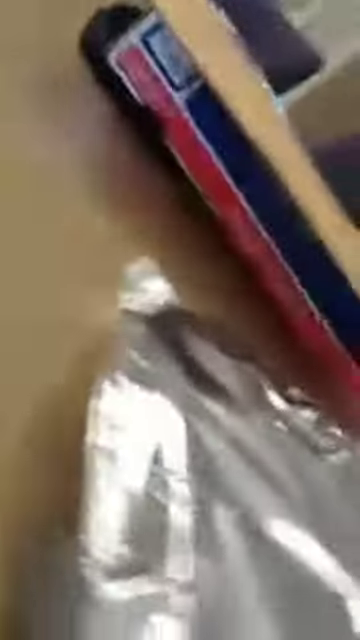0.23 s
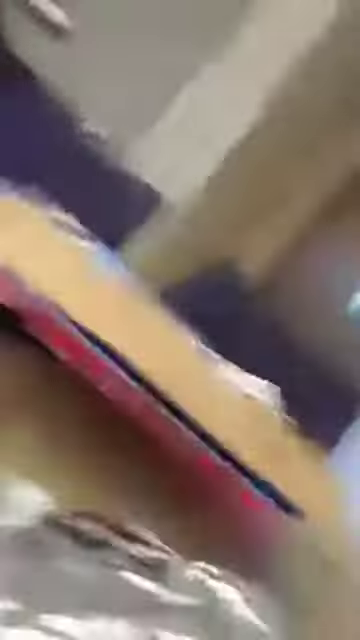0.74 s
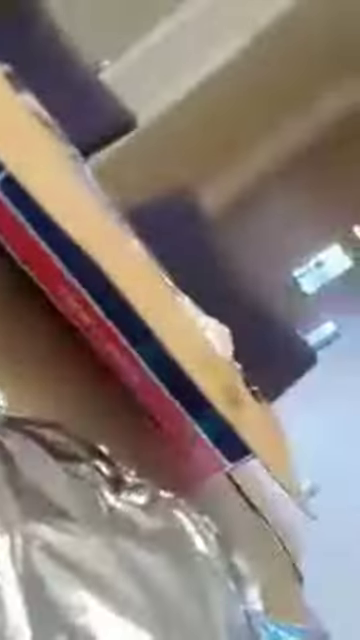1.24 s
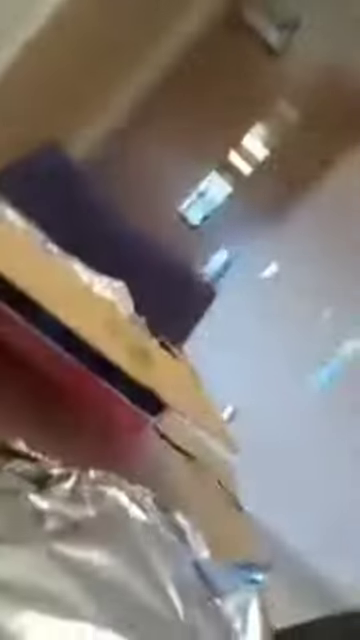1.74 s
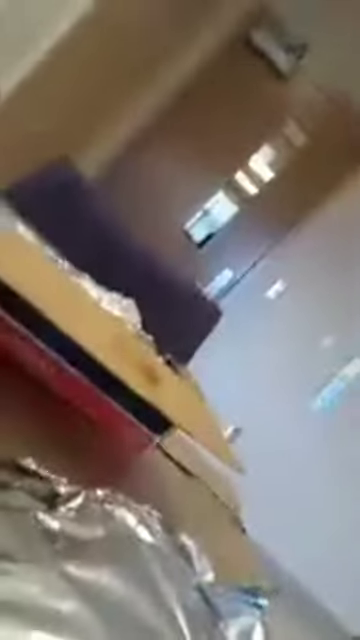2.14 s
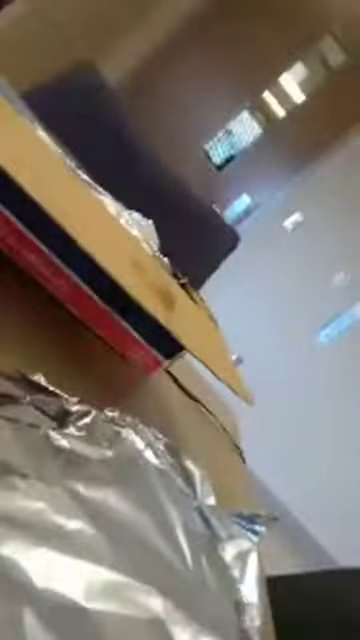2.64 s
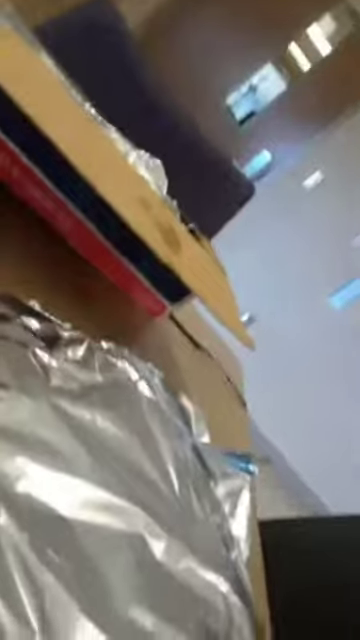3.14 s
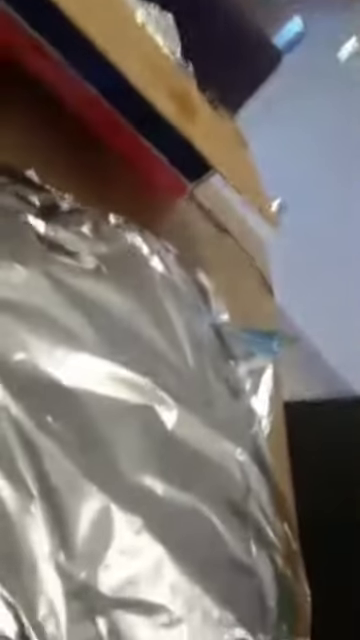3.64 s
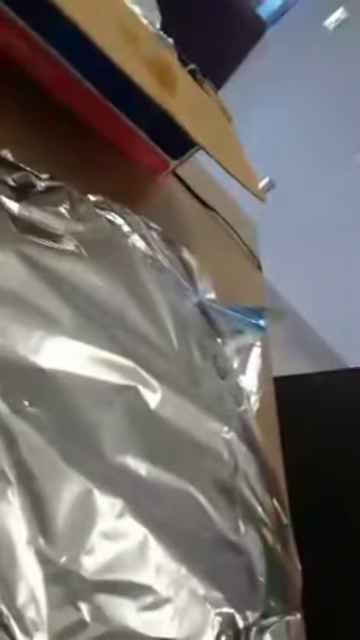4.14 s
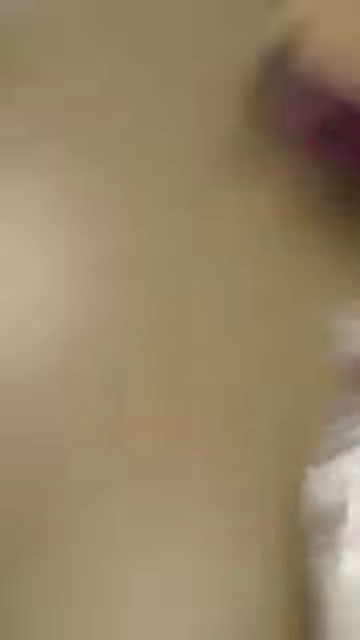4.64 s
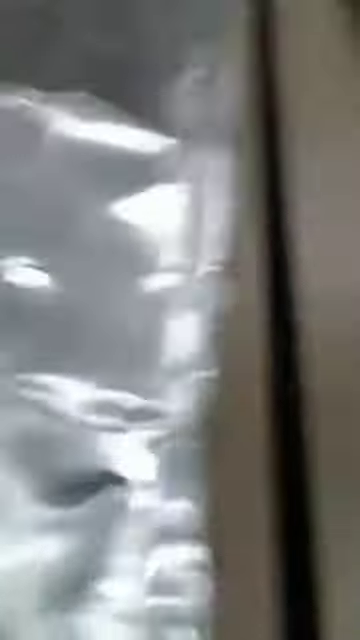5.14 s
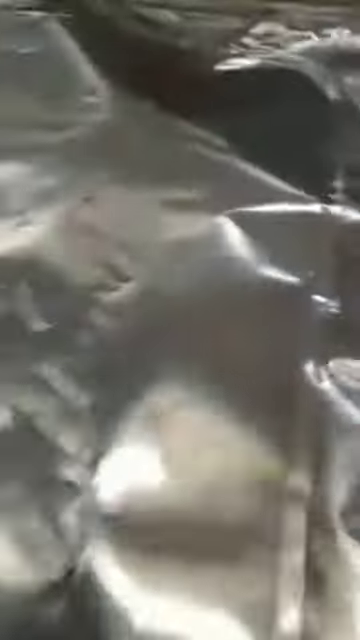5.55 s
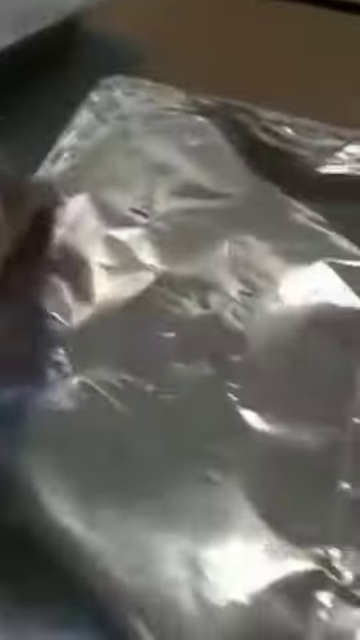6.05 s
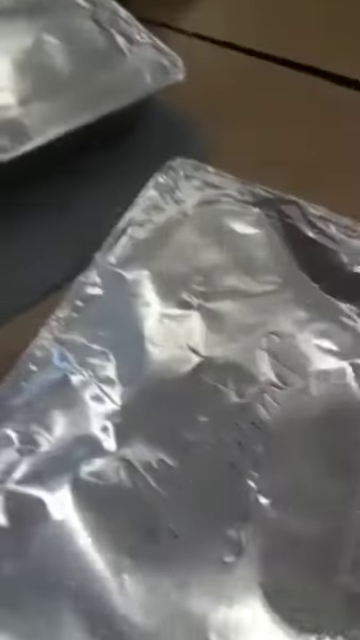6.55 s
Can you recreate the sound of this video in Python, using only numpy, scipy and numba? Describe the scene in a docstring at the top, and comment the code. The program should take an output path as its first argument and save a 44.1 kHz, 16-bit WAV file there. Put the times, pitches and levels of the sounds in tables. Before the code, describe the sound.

Right beside a phone at a table, hands move foil-covered pans. After a brief silence the foil crumples densely and loudly, with snaps and popping dents, then comes in separate bursts with quieter gaps. Table thuds and hollow knocks punctuate it. Near the end it is calmer, with light rustling, dull bumps on the phone and a quick clatter of pan knocks.

```python
"""At a table, right beside a phone, hands move foil-covered pans about.
The foil rustles in dense random buckles and snaps loose in crackles: noise and small ringing facets in
half-octave bands, each band dying at its own rate. Creases tick as short bright noise bursts and dents
pop as clusters of damped sines. The pans knock, the table thuds and the phone case bumps as struck modes,
while skin hisses over the foil and the grip on the phone shifts."""
import sys
import numpy as np
from scipy import signal
from scipy.fft import rfft, irfft, next_fast_len
from scipy.io import wavfile
from scipy.ndimage import uniform_filter1d
from numba import njit

SR = 44100
rng = np.random.default_rng(int(sys.argv[2]) if len(sys.argv) > 2 else 0)


def decibels_to_gain(level_db):
    """Convert a level in decibels to a linear amplitude gain (20 dB per decade)."""
    exponent = np.asarray(level_db, float) / 20
    return 10 ** exponent


def store_wav(level_fs):
    """Save 16-bit WAV to argv[1]."""
    pcm = np.round(np.clip(np.atleast_2d(level_fs), -1, 1) * 32767)
    wavfile.write(sys.argv[1], SR, pcm.T.astype(np.int16))


N = 299042
PAD = next_fast_len(N)
T = np.arange(N) / SR
BANDS_HZ = 35 * 2 ** np.arange(0, 9, .5)  # centres of the half-octave bands

# the hand shifts its grip on the phone: [start_s, hold_s, level_db]
GRIPS = [(0.1, 0.34, -51.5), (0.5, 0.033, -28), (0.652, 0.12, -30), (0.9, 0.53, -43), (1.5, 0.079, -30),
         (1.933, 0.28, -44.5), (2.306, 0.043, -34), (2.55, 0.13, -55), (2.785, 0.024, -41),
         (3.1, 0.023, -36), (3.829, 0.044, -32), (4.082, 0.11, -42), (4.533, .04, -32.5),
         (4.622, 0.093, -38), (5.207, 0.39, -45.5), (5.637, 0.11, -38), (6.0, 0.15, -34.5),
         (6.5, 0.3, -54.5)]
# fingers bump the phone: [start_s, level_db]
BUMPS = [(5.458, -39), (5.501, -30.5), (5.642, -29), (5.68, -29), (6.04, -38), (6.1, -43)]
# skin slides over the foil: [start_s, hold_s, level_db]
RUBS = [(0.073, 0.064, -51.5), (0.155, 0.084, -39.5), (0.232, 0.0909, -37), (0.336, 0.0088, -22),
        (0.626, 0.019, -24), (0.73, 0.028, -37), (0.845, 0.16, -44.5), (1.038, 0.28, -59),
        (1.258, 0.13, -55.5), (1.44, 0.17, -40.5), (1.665, 0.24, -57), (2.293, 0.051, -46),
        (2.487, 0.29, -59.5), (3.533, 0.085, -58.5), (3.92, 0.088, -57), (4.036, 0.08, -51),
        (4.185, 0.2, -54.5), (4.517, 0.17, -41.5), (4.629, 0.033, -37), (4.724, 0.15, -49),
        (5.104, 0.092, -41.5), (5.28, 0.39, -51.5), (5.703, 0.31, -54.5), (5.926, 0.22, -48),
        (6.153, 0.098, -38.5), (6.242, 0.13, -43.5), (6.38, 0.4187, -57.5), (6.603, 0.2, -46.5),
        (6.727, .07, -39.5)]
# a hand squeezes or shifts a pan: [start_s, hold_s, crumple_db, weight_db, crispness_db];
# weight (table rumble) and crispness (crackle) are relative to the crumpling
SQUEEZES = [(0.088, 0.03, -37, -13, -8), (0.124, 0.26, -24.5, -17, -14.5), (0.427, 0.15, -19.5, -15, -8),
            (0.605, 0.068, -21, -6, 2.5), (0.669, 0.014, -18.5, -4, -2.5), (0.753, 0.012, -15.5, -4, -3),
            (0.863, 0.12, -36.5, -1.5, -8.5), (1.05, 0.43, -50.5, 1, -4.5), (1.333, 0.028, -36.5, -1, -15),
            (1.507, 0.046, -27.5, 4.5, -7), (1.605, 0.06, -35, 2.5, -26.5), (1.75, 0.29, -54.5, 4, -1.5),
            (2, 0.12, -37.5, -2, -22.5), (2.107, 0.099, -32, -6, -22), (2.287, 0.078, -25.5, -28, -9),
            (2.48, 0.11, -40, -4, -11), (2.607, 0.048, -32.5, -0.5, -12), (2.86, 0.084, -52, -1, -6.5),
            (3.08, 0.053, -34, -3, -13), (3.502, 0.11, -56.5, 1, -5.5), (3.803, 0.0695, -30.5, -14, -21),
            (3.999, 0.057, -38.5, 5, -18), (4.118, 0.079, -40.5, 3.5, -31), (4.309, 0.094, -44, -2.5, -8.5),
            (4.548, 0.032, -53, 11, -8), (4.654, 0.039, -49, 9, -20), (4.666, 0.0068, -22.5, -9, -7.5),
            (4.79, 0.077, -56, 13.5, -4), (4.94, 0.2, -50.5, 3.5, -9), (5.175, 0.033, -62, 21.5, -15),
            (5.3, 0.074, -46, 0, -11.5), (5.466, 0.74, -52, 4.5, -10), (5.916, 0.29, -47.5, -10, -8),
            (6.188, 0.049, -41.5, -14, -7), (6.305, 0.022, -26.5, -27, -11), (6.416, 0.076, -49.5, 8, -3),
            (6.548, 0.13, -44, 2, -13), (6.77, .06, -37.5, 1, -3)]
# hollow knocks of a pan on the table: [start_s, level_db, depth_db]; depth is added for the lowest mode
KNOCKS = [(3.239, -21.5, 33.5), (3.643, -33, 30), (4.422, -25.5, 13), (5.1, -25, 8), (5.546, -31, 0),
          (5.625, -21.5, -7), (6.184, -18, -1), (6.224, -23, 3), (6.283, -20, 0), (6.293, -15.5, -2),
          (6.328, -12, -7), (6.345, -13, -4)]
# dents in the sheet popping through: [start_s, pitch_hz, level_db]
DENTS = [(0.186, 1054, -20), (0.21, 1190, -24), (0.229, 980, -21), (0.296, 710, -23.5), (0.402, 666, -17.5),
         (0.45, 1610, -13.5), (1.472, 916, -12), (1.6, 1426, -15.5), (1.629, 653, -20), (3.83, 1130, -13.5),
         (4.685, 2790, -25), (5.101, 1960, -30), (5.269, 1750, -36), (5.63, 1770, -34)]
# lone creases flipping: [start_s, level_db]
TICKS = [(0.0817, -34), (0.23, -26), (0.2794, -20), (0.3504, -8.5), (0.5234, -16), (0.647, -9.5),
         (0.7444, -25), (0.7497, -12), (0.7576, -14), (0.867, -26), (1.5186, -10), (1.5235, -12.5),
         (1.5523, -23), (1.5839, -8), (1.627, -22), (2.0144, -30), (2.047, -28.5), (2.2244, -34),
         (2.2717, -26), (2.391, -24), (2.4236, -12), (2.7657, -12.5), (3.164, -26), (3.852, -6), (3.87, -9),
         (4.254, -37.5), (4.484, -38), (4.521, -28), (4.637, -9), (6.164, -35), (6.3199, -24)]
# snaps of the foil: [start_s, blow_db, thud_db, brightness_db, ring_t60_s];
# thud and brightness are relative to the blow, the ring time is scaled by SHEET_DAMPING
SNAPS = [(0.281, -4.5, -36, -16, 0.03), (0.352, -15.5, -22, -10, 0.29), (0.4, -19, -17, -3, 0.069),
         (0.427, -14.5, -41, -9.5, 0.63), (0.46, -13, -34, -10.5, 0.17), (0.522, -7.5, -27.5, -8.5, 0.75),
         (0.617, -7.5, -59, -15, 1), (0.707, -11, -16, -7.5, 0.13), (0.734, -19, 6.5, -13, 0.069),
         (0.775, -8.5, -30, -7.5, 0.17), (0.87, -16.5, -26, -12, 0.095), (0.935, -19, -17.5, -25, 0.21),
         (1.32, -9.5, -23, -27, 0.078), (1.422, -31.5, -13, -7, 0.45), (1.436, -19, -20, -23, 0.47),
         (1.469, -11.5, -35, -12, 0.41), (1.558, -15, -9.5, -2.5, 0.13), (1.585, -15, -17, -2, 0.22),
         (1.628, -14, -27, -6.5, 0.042), (1.72, -24.5, -21.5, -29, 0.43), (1.755, -15.5, -18, -21, 0.023),
         (1.943, -30.5, -18, -9, 0.61), (1.964, -10.5, -38.5, -32, 0.085), (1.978, -18, -11, -2, 0.2),
         (2.081, -21.5, -19, -6, 0.16), (2.12, -14, -70, -7.5, 0.19), (2.208, -21, -18.5, -13, 0.31),
         (2.277, -16, -13, -49, 0.12), (2.33, -14, -12.5, -2.5, 0.21), (2.34, -12, -25.5, -1.5, 0.21),
         (2.424, -14, -73, -8, 0.13), (2.495, -26, -17, -16, 0.29), (2.767, -18.5, -22, -4.5, 0.2),
         (3.093, -12.5, -22, -6, 0.1), (3.096, -13, -19, -4, 0.16), (3.281, -39.5, -41.5, -8, 0.18),
         (3.478, -36, -11.5, -46, 0.061), (3.626, -21.5, -46, -17.5, 0.032), (3.642, -26.5, -5, -30, 0.16),
         (3.759, -25.5, -17, -21.5, 0.56), (3.79, -23, -13, -7, 0.62), (3.807, -17, -11, -4.5, 0.35),
         (3.828, -13.5, -9.5, -4, 0.22), (3.858, -8, -13, -5.5, 0.19), (3.98, -18.5, -25, -11.5, 0.15),
         (4.059, -18, -35, -11, 0.17), (4.112, -16.5, -9.5, 0.5, 0.12), (4.12, -12.5, -23.5, -10.5, 0.18),
         (4.226, -36.5, -2, -11, 0.26), (4.422, -16, -16, -30, 0.03), (4.482, -26, -32, -11, 0.03),
         (4.497, -22, -26, -14.5, 0.11), (4.537, -14, -16, -12.5, 0.14), (4.546, -17, -5, -2.5, 0.12),
         (4.632, -18.5, 5.5, -11, 0.18), (4.642, -9.5, -44, -14, 0.28), (5.098, -29.5, -1.5, -6, 0.37),
         (5.271, -30, -14, -9, 0.26), (5.546, -35, -13, -37, 0.13), (5.621, -31, -12.5, -10, 0.3),
         (6.163, -29.5, -6, -3.5, 0.12), (6.181, -27.5, -11.5, -37, 0.55), (6.224, -15, -29, -14.5, 0.1),
         (6.279, -17, -28, -24, 0.14), (6.325, -22.5, -12, -8, 0.2), (6.341, -25, -14, -0.5, 0.092)]
# resting level of each layer of the handling between gestures: {layer: level_db}
REST_DB = {"rumble": -70.5, "crumple": -61, "crackle": -72, "hiss": -66, "grip": -68.5}

# spectra of the layers of the handling: [frequency_hz, level_db]
GRIP_SPECTRUM = [(30, -10), (60, -5.5), (100, 5), (130, -4), (170, -46.5)]
RUMBLE_SPECTRUM = [(100, -37), (150, 14), (200, 8.5), (300, 3), (450, -30.5)]
CRUMPLE_SPECTRUM = [(200, -64.5), (430, 20.5), (900, 6.5), (1700, 8.5), (2700, -7), (4000, -48)]
CRACKLE_SPECTRUM = [(1800, -5.5), (2800, 8), (4000, -12.5), (5500, 7.5), (7500, -38.5)]
RUB_SPECTRUM = [(4500, -12), (6000, -13), (8500, -13), (10500, 6.5), (14000, -20)]
# spectrum of a flipping crease: [frequency_hz, level_db]
TICK_SPECTRUM = [(1500, -32.5), (3000, 14), (6000, 8.5), (8500, 8), (10500, 6), (14000, -1.5)]
# the treble of the whole mix is weaker around 10 kHz: [frequency_hz, gain_db]
TREBLE_DIP = [(8600, -1.5), (9700, -11), (10800, -10), (13500, -2.5)]
# factor on a given ring time of the sheet: [frequency_hz, time_ratio]
SHEET_DAMPING = [(100, 0.27), (300, 1.84), (1000, 1.36), (2500, 0.97), (5000, 0.61), (12000, 0.76)]
# modes of the phone case, the table top and a pan: [frequency_hz, level_db, t60_s]
CASE_MODES = [(70, 9, 0.058), (125, 7.5, .06)]
TABLE_MODES = [(104, -21.5, 0.081), (197.3, -0.5, 0.31)]
PAN_MODES = [(252, -32, 0.1), (499, -0.5, 0.091), (982, -8, 0.12)]


def at_hz(table, hz):
    """Linear interpolation of a spectrum on a logarithmic frequency axis."""
    table_hz, value = np.transpose(table)
    return np.interp(np.log(np.maximum(hz, 1)), np.log(table_hz), value)


def unit(x):
    """Normalization to an rms of 1."""
    return x / np.sqrt(np.mean(x ** 2))


def colour(x, table):
    """Linear filtering: the spectrum is multiplied by a gain in dB."""
    gain = decibels_to_gain(at_hz(table, np.fft.rfftfreq(PAD, 1 / SR)))
    return irfft(rfft(x, PAD) * gain, PAD)[:N]


def fade(t, t60):
    """Exponential decay of amplitude, 60 dB in t60 seconds."""
    return np.exp(-np.log(1000) * t / t60)


def bands(x):
    """Filter bank: overlapping half-octave bands with cosine flanks, each of rms 1."""
    octaves = np.log2(np.maximum(np.fft.rfftfreq(PAD, 1 / SR), 1) / BANDS_HZ[:, None])
    flank = np.cos(np.pi * np.clip(octaves, -.5, .5))
    split = irfft(rfft(x, PAD) * flank, PAD)[:, :N]
    return split / split.std(axis=1, keepdims=True)


def gestures(start, hold, db, rise_db_s, fall_db_s, rest_db):
    """Power addition of gestures that swell, hold and die linearly in dB, over a resting level."""
    t = T[::64, None]
    before = np.maximum(start - t, 0)
    after = np.maximum(t - start - hold, 0)
    each = db - rise_db_s * before - fall_db_s * after
    power = decibels_to_gain(rest_db) ** 2 + np.sum(decibels_to_gain(each) ** 2, axis=1)
    return np.interp(T, t[:, 0], 10 * np.log10(power))


def buckles(level_db, table, rate, spread_db, t60):
    """Shot noise: random buckles, many small and few large, as decaying power in each band."""
    size = decibels_to_gain(spread_db * np.minimum(rng.exponential(size=N), 4))
    impulses = (rng.random(N) < rate / SR) * size  # rate in buckles per second
    hit_power = (unit(impulses) * decibels_to_gain(level_db)) ** 2
    share = decibels_to_gain(at_hz(table, BANDS_HZ)) ** 2 * BANDS_HZ  # bandwidth grows with frequency
    share = share / share.sum()
    keep = fade(2 / SR, t60 * at_hz(SHEET_DAMPING, BANDS_HZ))  # power falls twice as fast in dB
    return np.array([w * signal.lfilter([1 - k], [1, -k], hit_power) for w, k in zip(share, keep)])


def strike(blows, modes):
    """Modal synthesis: short pushes excite a set of exponentially damped sines."""
    contact_s = .0006
    push = np.zeros(N)
    for s, db in blows:
        push[int(s * SR)] = decibels_to_gain(db)
    push = uniform_filter1d(push, size=int(contact_s * SR))
    t = np.arange(SR // 2) / SR
    ring = sum(decibels_to_gain(db) * np.sin(2 * np.pi * hz * t) * fade(t, t60) for hz, db, t60 in modes)
    return signal.fftconvolve(push, ring)[:N]


@njit
def ring_facets(size, start, turn, keep, gain):
    """Rotating phasor: each facet rings as one damped sine until it is 40 dB down."""
    out = np.zeros(size)
    for k in range(len(start)):
        z, step, i = gain[k] + 0j, keep[k] * np.exp(1j * turn[k]), start[k]
        while abs(z) > .01 * gain[k] and i < size:
            out[i] += z.imag
            z, i = z * step, i + 1
    return out


def facets(rate=3500, t60=0.078, spread_db=2.5):
    """Modal density: the sheet is a crowd of small facets, each with its own pitch, a few of them loud."""
    when, pitch, size = rng.random((3, int(rate * N / SR)))  # rate in facets per second
    hz = 14500 * pitch ** 1.3 + 100
    gain = decibels_to_gain(spread_db * np.minimum(-np.log(1 - size), 4))
    keep = fade(1 / SR, t60 * at_hz(SHEET_DAMPING, hz))
    return ring_facets(N, (when * N).astype(int), 2 * np.pi * hz / SR, keep, gain)


def shake(power, blur_db=0, click_db=-3, click_rate=400):
    """Forced vibration: band power drives single facets and sharp clicks over a blur of dense modes."""
    clicks = (rng.random(N) < click_rate / SR) * rng.standard_normal(N)  # rate in clicks per second
    blur = decibels_to_gain(blur_db) * rng.standard_normal(N)
    sheet = unit(facets()) + blur + decibels_to_gain(click_db) * unit(clicks)
    cycle = (SR / BANDS_HZ).astype(int) + 1  # a band needs one cycle to build up
    drive = [uniform_filter1d(np.sqrt(p), size=k, origin=(k - 1) // 2) for p, k in zip(power, cycle)]
    return np.sum(bands(sheet) * drive, axis=0)


def grip_shifts():
    """Friction noise: band power of the hand shifting its low-pitched grip on the phone."""
    level = gestures(*np.transpose(GRIPS), rise_db_s=250.5, fall_db_s=220.5, rest_db=REST_DB["grip"])
    return buckles(level, GRIP_SPECTRUM, rate=140, spread_db=2.5, t60=0.05)


def bumps():
    """Impact excitation: fingers bump the phone and ring the low modes of its case."""
    return strike(BUMPS, CASE_MODES)


def rubs():
    """Friction noise: band power of skin sliding over the foil, a dense high hiss."""
    level = gestures(*np.transpose(RUBS), rise_db_s=492, fall_db_s=597.5, rest_db=REST_DB["hiss"])
    return buckles(level, RUB_SPECTRUM, rate=700, spread_db=1.5, t60=.06)


def squeezes():
    """Buckling under load: one gesture drives table rumble, crumpling and crackle as band power."""
    start, hold, db, weight, crisp = np.transpose(SQUEEZES)

    def level(plus_db, layer):
        return gestures(start, hold, db + plus_db, rise_db_s=302, fall_db_s=268.5, rest_db=REST_DB[layer])

    rumble = buckles(level(weight, "rumble"), RUMBLE_SPECTRUM, rate=150, spread_db=1.0, t60=0.085)
    crumple = buckles(level(0, "crumple"), CRUMPLE_SPECTRUM, rate=190, spread_db=2.5, t60=0.22)
    crackle = buckles(level(crisp, "crackle"), CRACKLE_SPECTRUM, rate=290, spread_db=4.5, t60=0.14)
    return rumble + crumple + crackle


def thuds():
    """Impact excitation: the low part of every snap rings the table top."""
    return strike([(s, db + thud) for s, db, thud, *_ in SNAPS], TABLE_MODES)


def knocks():
    """Modal participation: knocks ring the pan, a flat landing exciting the lowest mode more."""
    upper = strike([(s, db) for s, db, _ in KNOCKS], PAN_MODES[1:])
    lowest = strike([(s, db + depth) for s, db, depth in KNOCKS], PAN_MODES[:1])
    return upper + lowest


def dents(scatter=0.095, spread_s=0.011, t60=0.07, count=5):
    """Snap-through: a popping dent sets off neighbouring facets of nearly equal pitch in turn."""
    s, hz, db = np.repeat(np.transpose(DENTS), count, axis=1)
    late, detune = rng.random((len(s), 2)).T
    start = ((s + spread_s * late ** 2) * SR).astype(int)
    hz = hz * (1 + scatter * (2 * detune - 1))
    keep = np.full(len(s), fade(1 / SR, t60))
    return ring_facets(N, start, 2 * np.pi * hz / SR, keep, decibels_to_gain(db))


def ticks(crest_db=-10, rise_s=0.00055, t60=0.086, spike_db=6):
    """Impulsive release: a flipping crease gives a sharp spike and a short bright noise burst."""
    flips = np.zeros(N)
    for s, db in TICKS:
        flips[int(s * SR)] = decibels_to_gain(db + crest_db)
    t = np.arange(SR // 8) / SR
    decay = fade(t, t60) + decibels_to_gain(spike_db) * fade(t, t60 / 6)
    envelope = signal.fftconvolve(flips, decay * np.minimum(t / rise_s, 1))[:N]
    return envelope * unit(colour(rng.standard_normal(N), TICK_SPECTRUM))


def snaps():
    """Frequency-dependent damping: band power of snaps that crack, then ring on in the sheet."""
    low_db, hollow_db, trim_db, top_db = -20, -3, -9, -9
    edge_db, edge_tilt = -10.5, 2.19  # the top follows the brightness, more steeply
    crack_db, crack_t60, crack_rise_s = 2.5, 0.013, 0.00079
    rise_share = 0.023  # rise of the ring as a share of its t60
    power = np.zeros((len(BANDS_HZ), N))
    t = np.arange(SR // 3) / SR
    crack = decibels_to_gain(crack_db) * fade(t, crack_t60) * np.minimum(t / crack_rise_s, 1)
    for s, db, thud, bright, t60 in SNAPS:
        edge = edge_db + edge_tilt * bright
        shape = [(60, thud + low_db), (190, thud), (330, (thud + trim_db) / 2 + hollow_db), (900, trim_db),
                 (2600, bright), (6500, edge), (8800, edge), (11000, edge + top_db)]
        gain = decibels_to_gain(db + at_hz(shape, BANDS_HZ))[:, None]
        ring = fade(t, t60 * at_hz(SHEET_DAMPING, BANDS_HZ)[:, None]) ** 2
        ring = ring * np.minimum(t / (rise_share * t60), 1)
        ring = ring * (1 - t / t[-1])  # reaches zero after a third of a second
        i = int(s * SR)
        power[:, i:i + len(t)] += (gain ** 2 * (ring + crack ** 2))[:, :N - i]
    return power


def scene():
    """Superposition of all sources into one mono sound, with a faint random treble difference added."""
    start_s, fade_in_s = 0.055, 0.021  # silence, then a quick fade-in
    side_db, side_hz = -20, 4400
    foil = shake(grip_shifts() + rubs() + squeezes() + snaps())
    mono = colour(foil + bumps() + thuds() + knocks() + dents() + ticks(), TREBLE_DIP)
    mono = mono * np.clip((T - start_s) / fade_in_s, 0, 1)
    treble = signal.sosfilt(signal.butter(8, side_hz, "high", fs=SR, output="sos"), mono)
    random_gain = unit(uniform_filter1d(rng.standard_normal(N), size=120))
    side = decibels_to_gain(side_db) * treble * random_gain
    return np.array([mono + side, mono - side])


def band_limit(x):
    """A steep low-pass at the top of the band."""
    return signal.sosfilt(signal.butter(12, 15700, fs=SR, output="sos"), x)


def record(dry):
    """Band limiting and saturation: the phone drops deep bass, rounds the loudest peaks, cuts the top."""
    low_hz, top_hz = 67.5, 14350
    thin = signal.sosfilt(signal.butter(2, low_hz, "high", fs=SR, output="sos"), dry)
    soft = np.tanh(thin) / 1.258
    cut = signal.sosfilt(signal.ellip(10, .2, 68, top_hz, fs=SR, output="sos"), soft)
    return band_limit(cut)


dry = scene()
out = record(dry)
store_wav(out)
```